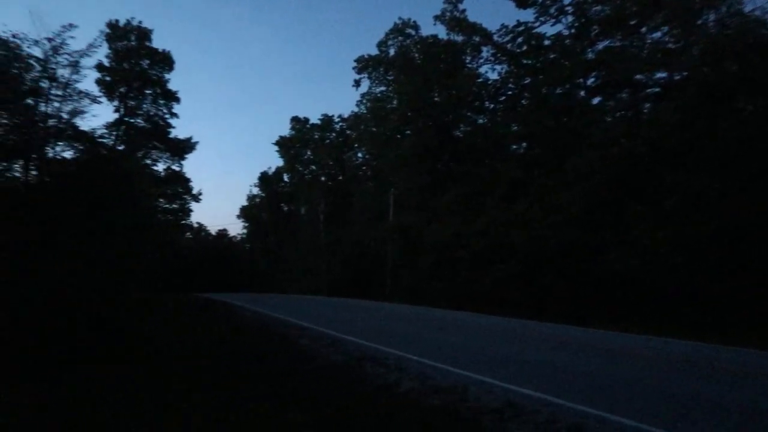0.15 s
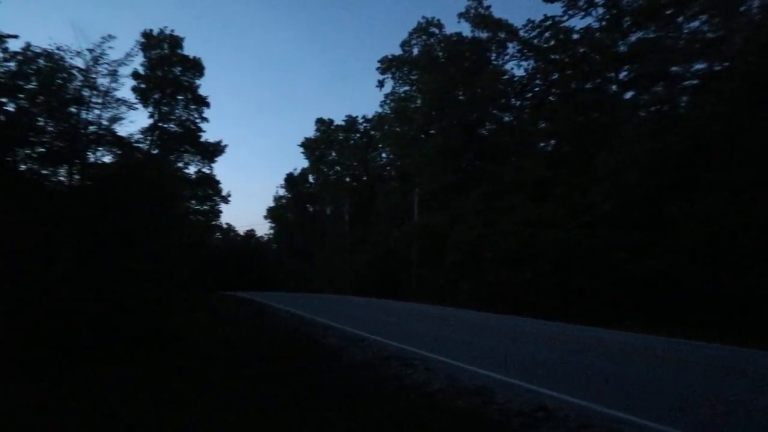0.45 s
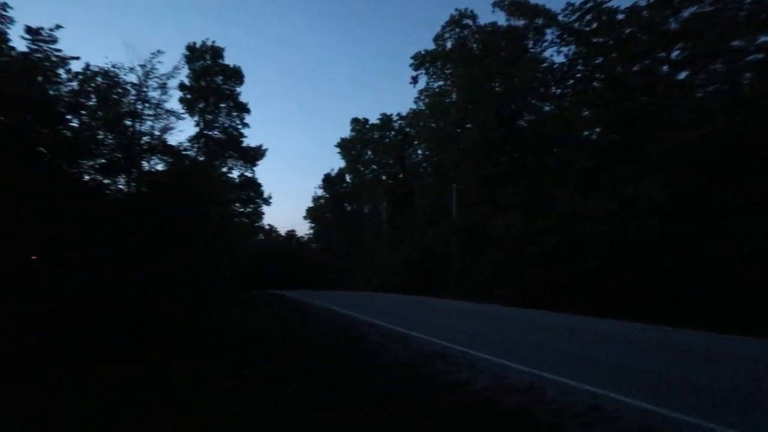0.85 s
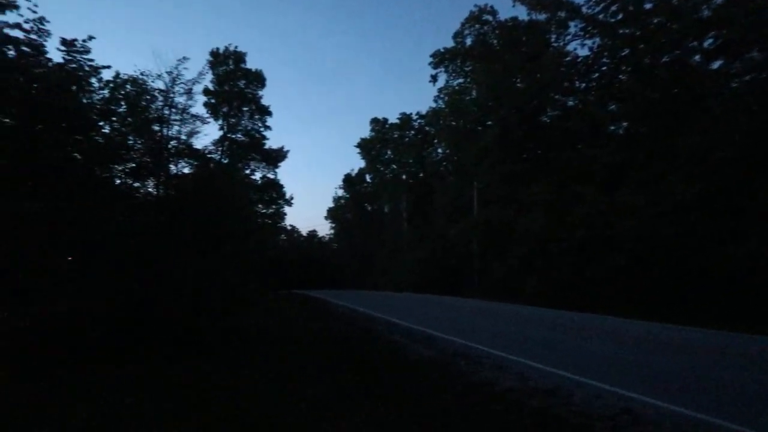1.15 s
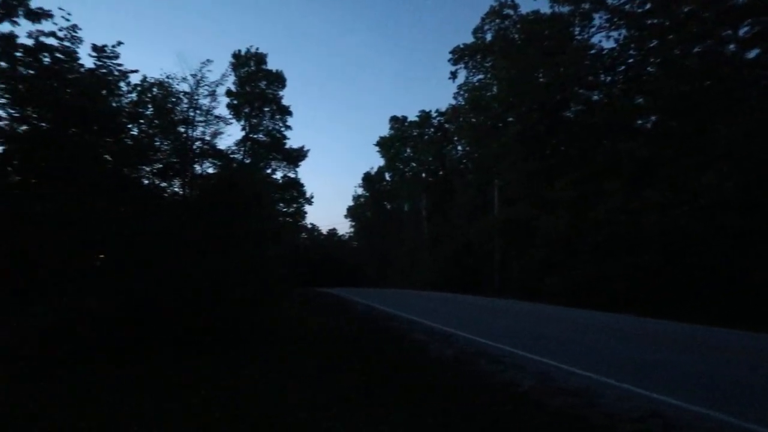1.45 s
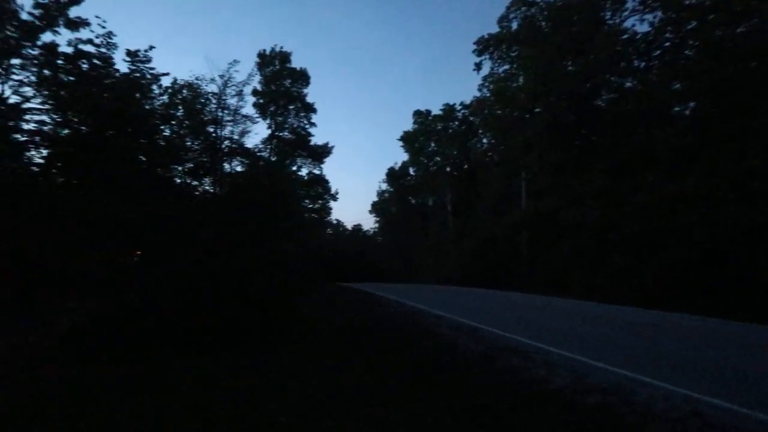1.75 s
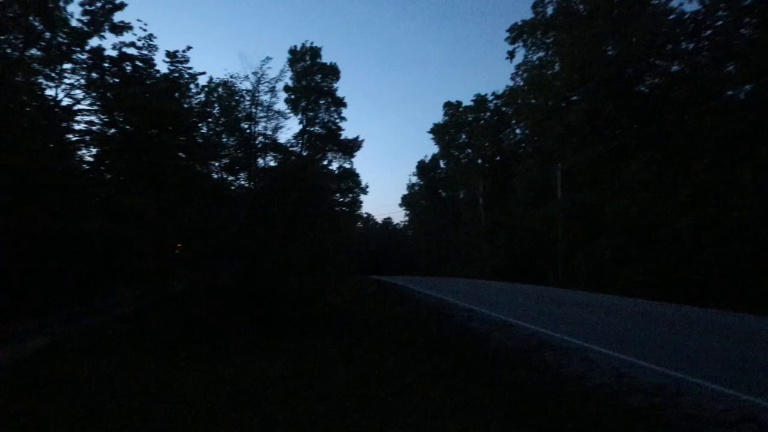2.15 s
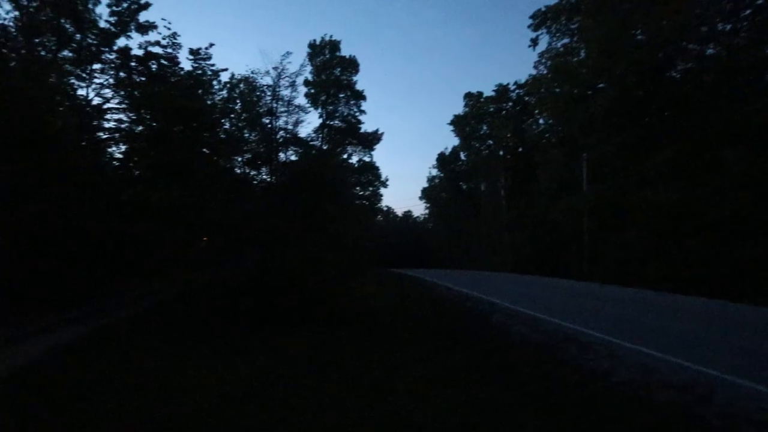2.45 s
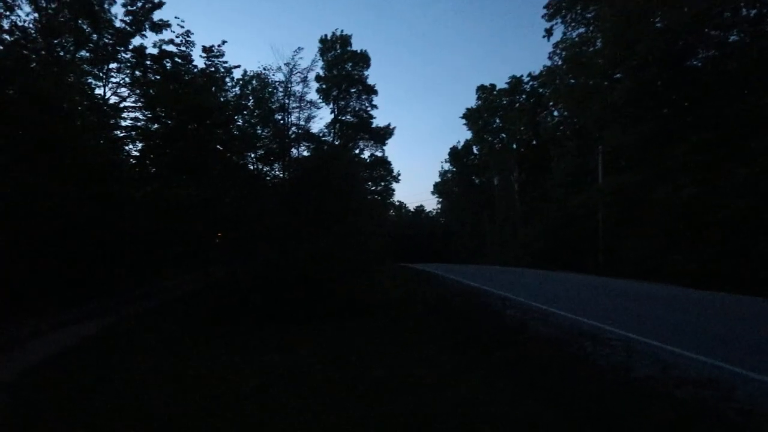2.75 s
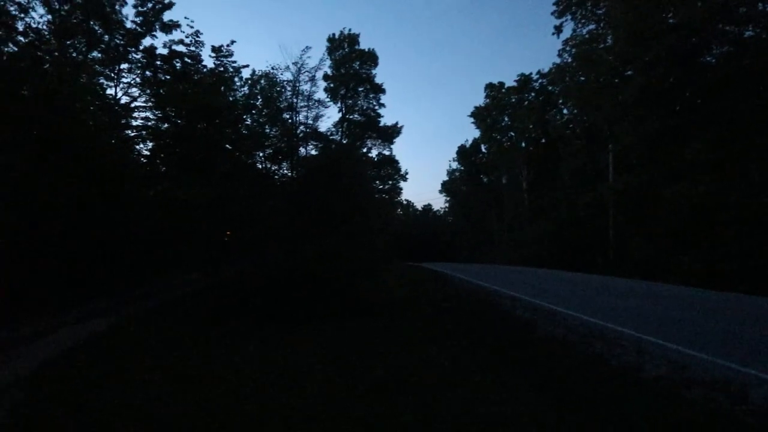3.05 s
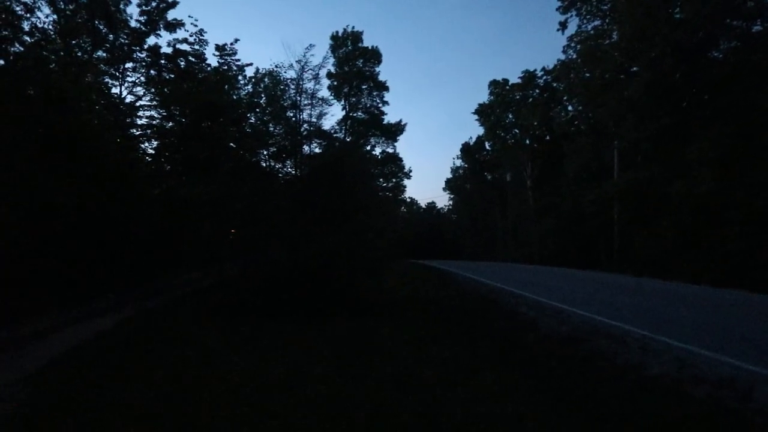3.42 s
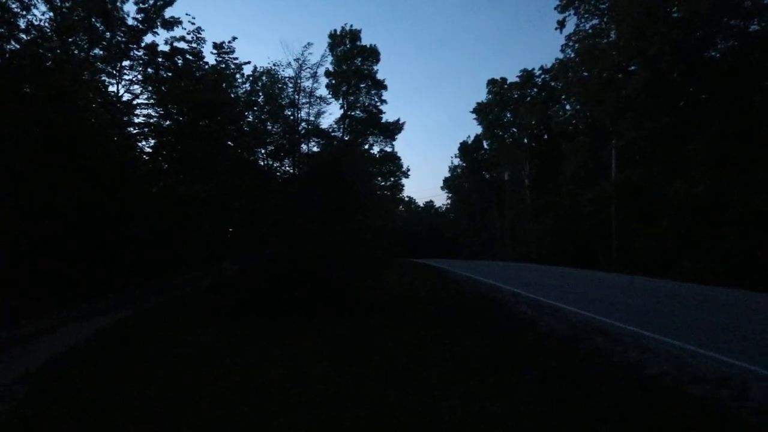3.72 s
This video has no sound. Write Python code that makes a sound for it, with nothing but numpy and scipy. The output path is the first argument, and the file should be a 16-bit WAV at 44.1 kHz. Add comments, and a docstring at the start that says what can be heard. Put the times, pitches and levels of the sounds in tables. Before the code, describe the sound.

A whip-poor-will repeats a clear three-note whistle four times, about once a second, echoing off trees and drifting right; a close cricket on the right chirps in stuttering runs over faint hiss, stereo microphones.

```python
"""Dusk on a woodland road, heard on a left-right microphone pair, over rumble, hum, hiss and far insects (noise).
From the first instant a cricket close on the right scrapes stuttering runs of short tones, pure or scratchy.
At 0.04 s a whip-poor-will whistles its three notes, one gliding sine, and the trees echo it.
It calls again about once a second, at 1.06, 2.06 and 3.05 s, drifting to the right; the cricket
pauses after 1.2 s, then carries on in runs to the end."""
import sys
import numpy as np
from scipy import signal
from scipy.fft import rfft, irfft, next_fast_len
from scipy.io import wavfile
from scipy.ndimage import map_coordinates

SR = 44100
rng = np.random.default_rng(int(sys.argv[2]) if len(sys.argv) > 2 else 0)


def wav_record(signal):
    """Record a signal, one row per channel, as 16-bit PCM in the file named by sys.argv[1]."""
    frames = np.transpose(np.atleast_2d(signal))
    bounded = np.clip(frames, -1, 1)
    # unit amplitude maps onto the largest positive 16-bit level
    quanta = np.round(bounded * 32767).astype(np.int16)
    wavfile.write(sys.argv[1], SR, quanta)


N = 171108


def amp(db):
    """Decibels to gain."""
    return 10 ** (np.asarray(db) / 20)


def unit(x):
    """Scaled to rms 1."""
    return x / np.sqrt(np.mean(x ** 2) + 1e-20)


def along(points, hz):
    """A table of (f/Hz, value) read on a log frequency axis."""
    f, v = np.transpose(points)
    return np.interp(np.log(hz + 1), np.log(f + 1), v)


def wobble(rate):
    """A smooth random curve through normally scattered knots, rate of them a second."""
    knots = rng.standard_normal(int(N * rate / SR) + 4)
    return map_coordinates(knots, [np.arange(N) * rate / SR])


def filtered(x, response):
    """x times a response of frequency."""
    m = next_fast_len(N + SR // 2)
    return irfft(rfft(x, m) * response(np.fft.rfftfreq(m, 1 / SR)), m)[..., :N]


def shaped(x, spectrum):
    """x through a table of (f/Hz, level/dB)."""
    return filtered(x, lambda hz: amp(along(spectrum, hz)))


def pan(db):
    """Left and right gains for a level difference, positive to the left."""
    return amp(np.array([[db], [-db]]) / 2)


def from_side(x, lead_s):
    """A sound reaching the left microphone lead_s earlier than the right."""
    ears = np.array([[1], [-1]])
    return filtered(x, lambda hz: np.exp(1j * np.pi * hz * lead_s * ears))


# likeness of the two microphones in diffuse sound: f/Hz, correlation (0-1)
LIKENESS = [(40, 0.78), (120, 0.9), (260, 0.33), (600, 0.17), (3000, 0.039)]


def rush(spectrum):
    """Stereo noise of rms 1, alike in the bass and nearly unrelated in the treble."""
    def mid_and_side(hz):
        turn = np.arccos(np.clip(along(LIKENESS, hz), -1, 1)) / 2
        return amp(along(spectrum, hz)) * [np.cos(turn), np.sin(turn)]

    mid, side = filtered(rng.standard_normal((2, N)), mid_and_side)
    return unit(np.array([mid + side, mid - side]))


# spectra of the far bed, each relative within itself: f/Hz, level/dB per Hz
RUMBLE_SPECTRUM = [(20, -19), (43, -3.5), (80, -3), (125, 0), (179, -9.5), (240, -7), (380, -11),
                   (1100, -20), (2420, -56)]
HUM_SPECTRUM = [(50, -50), (56, 6), (62, -27), (100, -44), (112, -5), (124, -34)]
HISS_SPECTRUM = [(600, -47), (1100, -16), (3600, -21.5), (5200, -27), (7000, -23.5), (8850, -21.5),
                 (10000, -25.5), (12700, -28.5), (15800, -49.5)]
CHORUS_SPECTRUM = [(3400, -25), (3950, -4), (4250, -3), (4550, 4.5), (4850, -35), (5300, -41)]
# slow swell shared by rumble and hum: t/s, level/dB
LOW_SWELL = [(0, -0.5), (1.6, 1.06), (2.9, -0.5), (3.8, 1.5)]
RUMBLE_DB, HUM_DB, HISS_DB, CHORUS_DB = -52.5, -63, -56.5, -58


def background(shimmer_db=1.0):
    """Shaped noise: distant rumble and low hum, a soft hiss and a shimmering band of far insects."""
    swell = amp(np.interp(np.arange(N) / SR, *np.transpose(LOW_SWELL)))
    low = swell * (amp(RUMBLE_DB) * rush(RUMBLE_SPECTRUM) + amp(HUM_DB) * rush(HUM_SPECTRUM))
    hiss = amp(HISS_DB) * rush(HISS_SPECTRUM)
    shimmer = amp(CHORUS_DB + shimmer_db * wobble(40.05))
    return low + hiss + shimmer * rush(CHORUS_SPECTRUM)


# how long the woods ring: f/Hz, t60/s
WOODS_RING = [(1200, 1.48), (1700, 1.29), (2700, 0.89), (9000, 0.52)]
WOODS_BUILD_S = 0.033
CLUMP_DB, CLUMPS_PER_S = 2, 110


def woods(x):
    """The long answer of the forest, from all around; stands of trees return it in clumps."""
    noise = rng.standard_normal((2, SR + SR // 2))
    hz, t, z = signal.stft(noise, SR, nperseg=256)
    decay = amp(-60 * t / along(WOODS_RING, hz)[:, None])
    build = 1 - np.exp(-t / WOODS_BUILD_S)
    tail = signal.istft(z * decay * build, SR, nperseg=256)[1]
    tail = tail * amp(CLUMP_DB * wobble(CLUMPS_PER_S)[:tail.shape[1]])
    tail = tail / np.linalg.norm(tail, axis=1, keepdims=True)
    return signal.fftconvolve(x[None], tail, axes=1)[:, :N]


# echoes from the forest edges, relative to the direct sound: delay t/s, level/dB
EDGE_ECHOES = [(.068, -12.5), (.128, -18), (.205, -20), (.253, -21.5)]
TRUNKS_DB, TRUNKS_T60_S = -8, .12


def trunks(x):
    """The direct sound, its quick scatter from trunks along the way and echoes from the forest edges."""
    t = np.arange(SR // 2) / SR
    scatter = rng.standard_normal(len(t)) * amp(-60 * t / TRUNKS_T60_S)
    scattered = signal.fftconvolve(x, scatter / np.linalg.norm(scatter))[:N]

    def edges(hz):
        return sum(amp(db) * np.exp(-2j * np.pi * hz * delay) for delay, db in EDGE_ECHOES)

    return x + amp(TRUNKS_DB) * scattered + filtered(x, edges)


# runs of evenly spaced wing strokes: first t/s, last t/s, strokes, level/dB before CRICKET_DB,
# mean f/Hz before scatter and sag, stroke length/s, typical scratchiness (0-1)
CHIRP_RUNS = [ (.002, .029, 2, -33.5, 4270, .010, 0.12), (.075, .075, 1, -39.5, 4160, .006, 0.9),
              (.104, .159, 3, -34, 4265, .011, .08), (.319, .384, 4, -33.5, 4190, .008, 0.2),
              (.407, .457, 3, -33, 4260, .006, 0.34), (.484, .562, 4, -33.5, 4185, .011, 0.17),
              (0.59, .615, 2, -35.5, 4180, .007, 0.7), (0.644, .700, 3, -33, 4213, .011, 0.26),
              (.881, .881, 1, -35.5, 4170, .009, 0.33), (0.927, .992, 4, -33, 4247, .007, 0.24),
              (1.019, 1.119, 5, -33.5, 4176, .010, 0.27), (1.147, 1.209, 3, -34.5, 4160, .012, 0.22),
              (1.575, 1.660, 5, -34, 4185, .006, 0.34), (1.681, 1.782, 5, -39.5, 3960, .006, 0.68),
              (1.809, 1.916, 5, -32, 4210, .009, 0.19), (1.942, 1.967, 2, -34, 4173, .007, 0.64),
              (1.995, 2.206, 9, -32.5, 4225, .010, 0.19), (2.257, 2.334, 4, -31.5, 4270, .009, 0.42),
              (2.369, 2.369, 1, -33.5, 4170, .014, 0.39), (2.648, 2.648, 1, -33, 4210, .010, 0.19),
              (2.692, 2.785, 5, -31, 4253, .008, 0.29), (2.811, 2.838, 2, -30.5, 4090, .010, 0.24),
              (2.872, 2.891, 2, -31, 4330, 0.0074, 0.41), (2.919, 2.997, 4, -31.5, 4060, .010, 0.33),
              (3.032, 3.031, 1, -30.5, 4187, .012, 0.22), (3.054, 3.106, 3, -30, 3930, .007, 0.25),
              (3.136, 3.291, 7, -31, 4245, 0.012, 0.25), (3.317, 3.317, 1, -29.5, 4080, .008, 0.58),
              (3.346, 3.373, 2, -32, 4156, .013, 0.29), (3.517, 3.677, 8, -30, 4266, .009, 0.24),
              (3.704, 3.835, 6, -32.5, 4285, .009, 0.51), (3.868, 3.868, 1, -32, 4250, .011, 0.33)]
# third partial against the first: t/s, level/dB
THIRD_PARTIAL = [(.5, -32), (1.1, -22), (1.7, -19.5), (1.85, -19.5), (2.15, -19), (2.35, -22), (3.8, -27)]
# colour of the scraping noise: f/Hz, level/dB
SCRATCH_SPECTRUM = [(2500, -27), (3400, -1), (4200, 5.5), (5200, -4), (6600, 0), (8500, -7.5), (12000, -10),
                    (15500, -23)]
# resonances of the wing: f/Hz, level/dB
WING_RESONANCES = [(3000, 0.5), (3800, -5), (4280, 0.5), (4800, -5.5), (8400, -1), (11900, -8),
                   (12550, 2.5), (13000, -20)]
# the cricket at the left microphone against the right: f/Hz, level/dB
FAR_MICROPHONE = [(3000, -24), (4200, -21), (6500, -10.5), (9000, -22), (12500, -4.5)]
CRICKET_DB, CRICKET_ECHO_DB, CRICKET_LEAD_S = -2.5, -18, -0.00015  # right microphone first
# the wing slows towards the end of each stroke; glide and sag are fractions of the pitch
STROKE_GLIDE, STROKE_SAG, SAG_CURVE, STROKE_EDGE_S = .025, 0.067, 4.1, .002
STROKE_SCATTER_DB, PITCH_SCATTER, SLIP_RAD = 1, 0.016, 1
SECOND_DB, SKIP_DB, SCRATCH_DB, SCRATCH_ENDS = -21.5, -8, -3, 0.72


def cricket():
    """Each wing stroke is a short sagging tone; where the scraper slips on the file it turns scratchy."""
    t, tone, scrape = np.arange(N) / SR, np.zeros(N), np.zeros(N)
    slips = wobble(1500)
    for first, last, strokes, db, hz, length, scratchy in CHIRP_RUNS:
        for centre in np.linspace(first, last, round(strokes)):
            size, tune, catch, slowing = rng.standard_normal(size=4)
            half = (length + STROKE_EDGE_S) / 2
            on = slice(*np.searchsorted(t, [centre - half, centre + half]))
            u = (t[on] - centre + half) / (2 * half)  # 0 to 1 through the stroke
            from_middle = abs(2 * u - 1)
            edges = np.clip(half * (1 - from_middle) / STROKE_EDGE_S, 0, 1)
            level = amp(CRICKET_DB + db + STROKE_SCATTER_DB * size) * edges

            glide = STROKE_GLIDE * np.exp(slowing / 2) * (u - .5)
            sag = STROKE_SAG * (abs(u) ** SAG_CURVE - .5 ** SAG_CURVE)
            pitch = hz * (1 + PITCH_SCATTER * tune - glide - sag)
            # the scraper bites as it lands and leaves
            rough = scratchy * np.exp(0.3 * catch + SCRATCH_ENDS * (from_middle - .5))
            phase = 2 * np.pi * np.cumsum(pitch) / SR + SLIP_RAD * rough * slips[on]

            partials_db = [0, SECOND_DB, np.interp(centre, *np.transpose(THIRD_PARTIAL))]
            partials = sum(gain * np.sin(k * phase) for k, gain in enumerate(amp(partials_db), 1))
            tone[on] += np.sqrt(2) * level * partials
            # skipped teeth add a partial below the octave
            tone[on] += amp(SKIP_DB) * level * rough * np.sin(1.5 * phase)
            scrape[on] += level * rough
    grit = unit(shaped(rng.standard_normal(N), SCRATCH_SPECTRUM))
    wing = shaped(tone, WING_RESONANCES) + amp(SCRATCH_DB) * scrape * grit
    pair = np.array([shaped(wing, FAR_MICROPHONE), wing])
    return from_side(pair, CRICKET_LEAD_S) + amp(CRICKET_ECHO_DB) * woods(wing)


# the bird's calls, drifting right as the microphones turn: start t/s, level/dB before BIRD_DB,
# brightness/dB per octave, left-right level/dB, lead of the left microphone/s, flutter t/s after the start
CALLS = [(.043, 0, -1.5, 0, 0.00018, 0.57), (1.056, -0.25, -1, -1.5, 0.00014, .5845),
         (2.055, 0, -1.5, -3, 0.000077, .58), (3.052, .5, -0.5, -3, 0.000069, 0.58)]
# the three notes of a call in order: t/s after its start, f/Hz before waver and flutter, effort level/dB
FIRST_NOTE = [(0, 1330, -7), (.014, 1437, 2), (.033, 1617, 2), (.053, 1669, -6), (.068, 1700, 4),
              (.084, 1561, -11), (.099, 1686, 1), (.111, 1674, -1), (.123, 1648, 7), (.134, 1400, -20)]
MIDDLE_NOTE = [(0.302, 1225, -9), (0.36, 1209, -7.5), (0.376, 1283, 4.5), (0.409, 1275, -11),
               (.423, 1490, 0), (.46, 1587, -0.5), (.48, 1295, 0), (0.499, 1427, -2)]
LAST_NOTE = [(.497, 1437, -3), (.513, 1587, 5), (.534, 1595, 9), (.542, 1477, -9), (.555, 1698, 5.5),
             (.57, 2023, 5.5), (.588, 2290, 8.5), (.602, 2639, 6), (.616, 2770, 3), (.62, 2386, 9),
             (.629, 1905, -2.5), (.634, 1770, 6), (0.643, 1500, -6)]
BIRD_DB, NOTE_EDGE_S, MIDDLE_HZ = -41, 0.005066, 1600  # brightness tilts about the middle
WAVER = 0.0042  # fraction of the pitch
# a fast flutter on the last note's rise, its depth a fraction of the pitch
WARBLE_SPAN_S, WARBLE_HZ, WARBLE_DEPTH = 0.021, 84.8, 0.08
WOODS_DB, WOODS_PAN_DB = -4, -3.5


def whip_poor_will():
    """One pure whistle glides through the same three notes in every call, and the woods answer."""
    t, out = np.arange(N) / SR, np.zeros((2, N))
    for start, db, bright_db, pan_db, lead_s, flutter_s in CALLS:
        call, waver = np.zeros(N), 1 + WAVER * wobble(120)
        for note in (FIRST_NOTE, MIDDLE_NOTE, LAST_NOTE):
            s, hz, effort_db = np.transpose(note)
            on = (t > start + s[0] - NOTE_EDGE_S) & (t < start + s[-1] + NOTE_EDGE_S)
            age = t[on] - start
            inside = np.minimum(age - s[0], s[-1] - age)
            gate = np.sin(np.pi / 2 * np.clip(1 + inside / NOTE_EDGE_S, 0, 1)) ** 2

            since = age - flutter_s
            burst = np.exp(-(since / WARBLE_SPAN_S) ** 2)
            warble = WARBLE_DEPTH * burst * np.cos(2 * np.pi * WARBLE_HZ * since)
            pitch = np.interp(age, s, hz) * (waver[on] + warble)
            tilt_db = bright_db * np.log2(pitch / MIDDLE_HZ)
            level_db = BIRD_DB + db + np.interp(age, s, effort_db) + tilt_db
            call[on] += gate * amp(level_db) * np.sin(2 * np.pi * np.cumsum(pitch) / SR)
        out += pan(pan_db) * from_side(trunks(call), lead_s)
        out += amp(WOODS_DB) * pan(WOODS_PAN_DB) * woods(call)
    return out


def scene():
    """The dusk around them, the cricket close by and the calling bird."""
    return background() + cricket() + whip_poor_will()


def record(dry):
    """The microphone signal keeps nothing from 15.8 kHz up."""
    return filtered(dry, lambda hz: hz < 15800)


dry = scene()
out = record(dry)
wav_record(out)
```